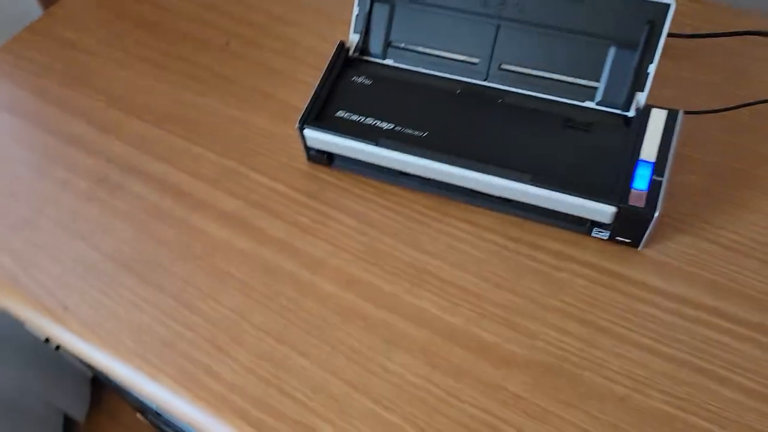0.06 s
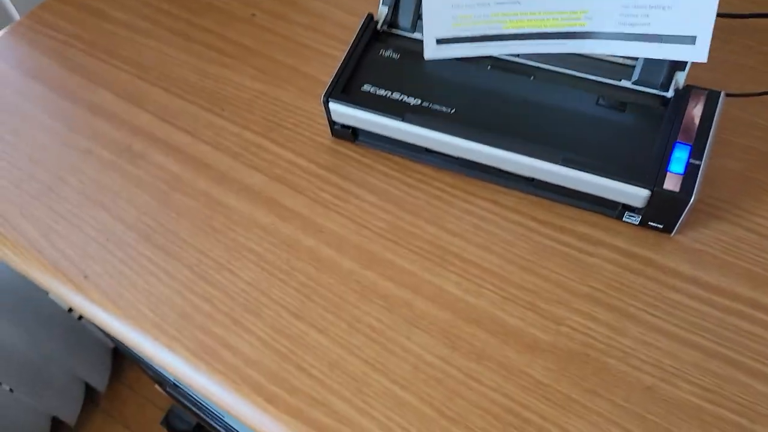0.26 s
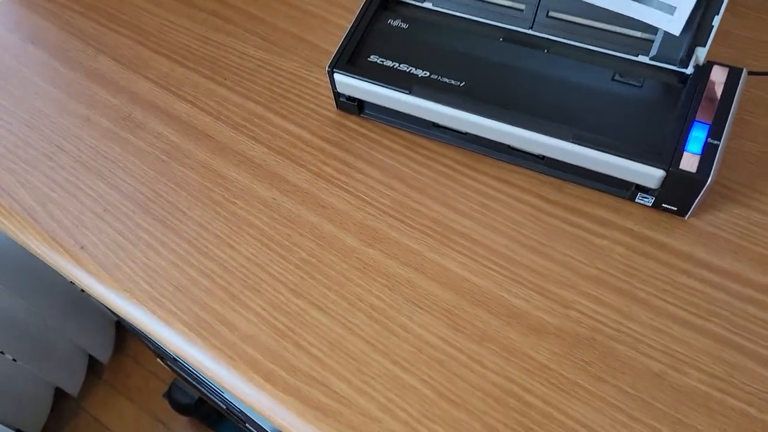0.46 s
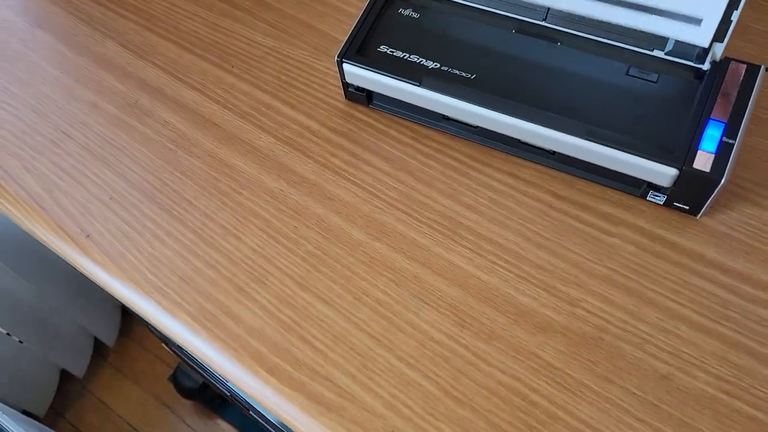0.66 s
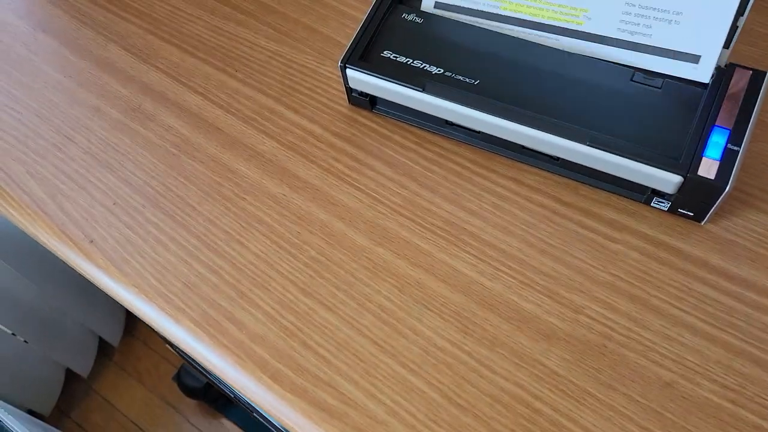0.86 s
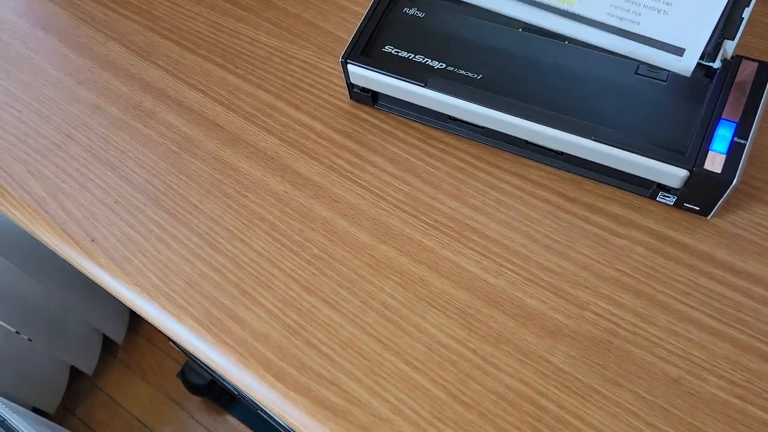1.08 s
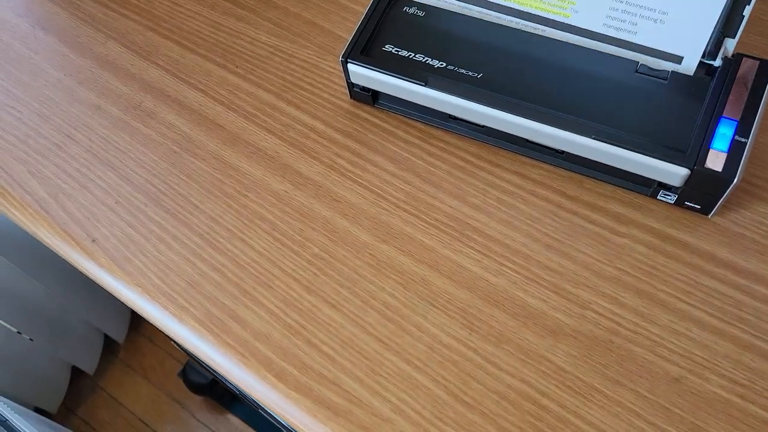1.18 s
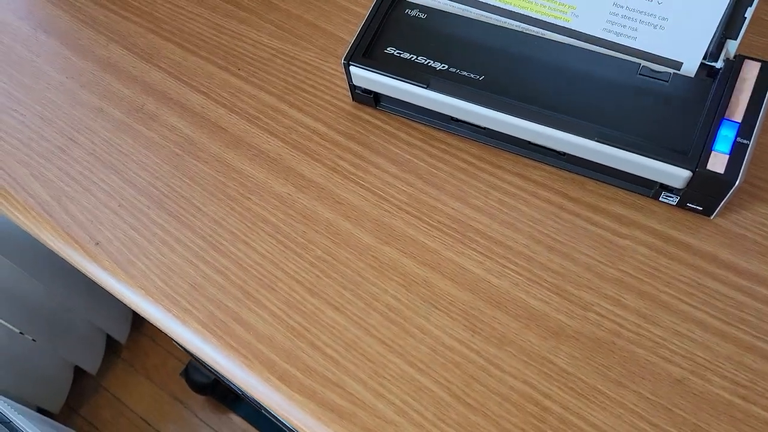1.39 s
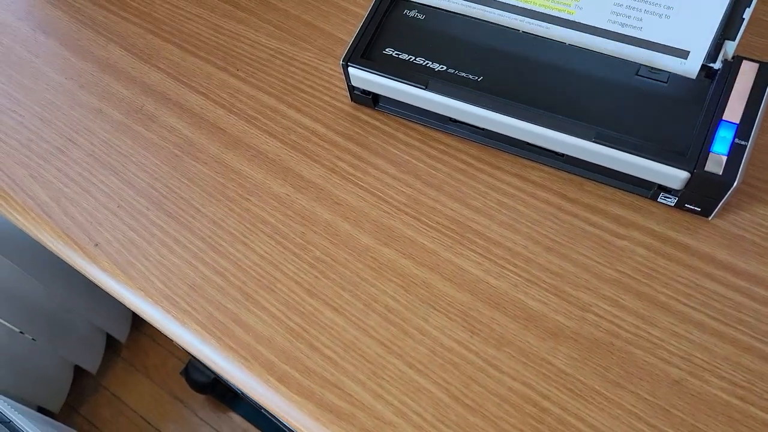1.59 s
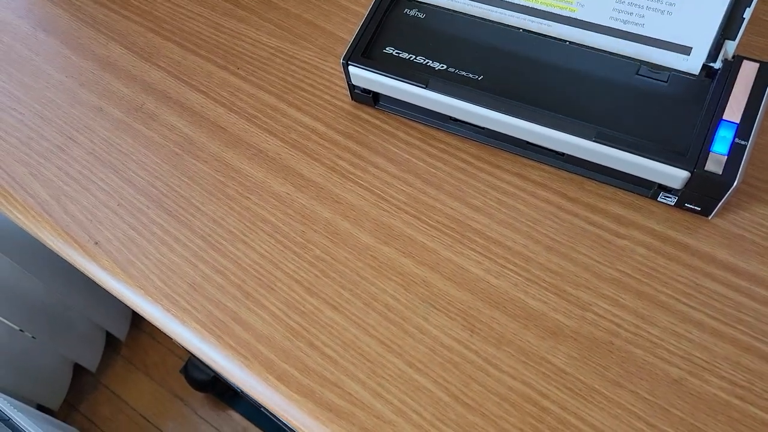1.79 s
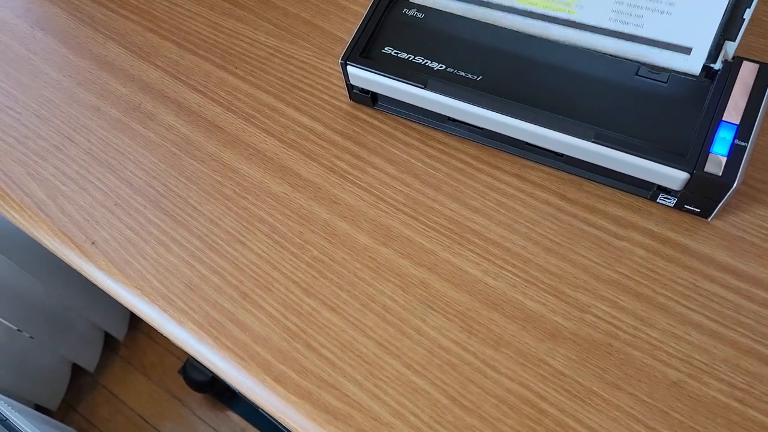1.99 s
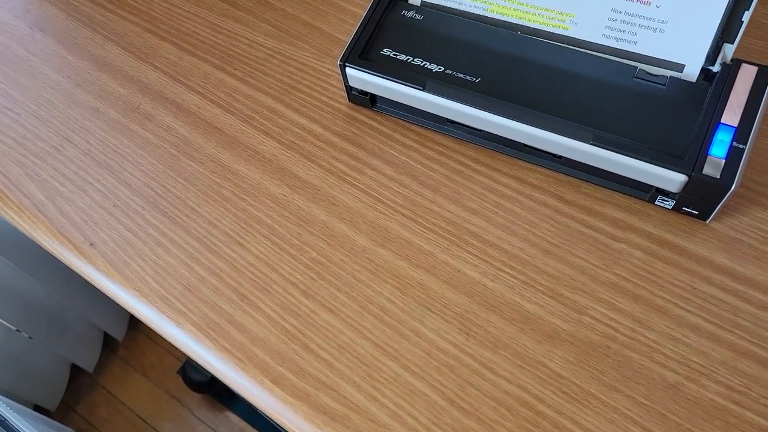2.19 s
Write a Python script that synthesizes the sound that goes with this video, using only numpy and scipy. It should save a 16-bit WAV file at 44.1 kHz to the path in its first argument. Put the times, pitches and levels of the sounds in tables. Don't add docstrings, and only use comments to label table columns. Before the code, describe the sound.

Paper stack scraped and knocked into a small scanner's hollow plastic feed tray, in a quiet room

```python
import sys
import numpy as np
from scipy import signal
from scipy.fft import rfft, irfft, next_fast_len
from scipy.io import wavfile

SR = 44100
rng = np.random.default_rng(int(sys.argv[2]) if len(sys.argv) > 2 else 0)


def store_pcm(level_fs):
    pcm = np.round(np.clip(level_fs, -1, 1) * 32767).astype(np.int16)
    wavfile.write(sys.argv[1], SR, np.atleast_2d(pcm).T)


def linear_from_db(decibels):
    return 10 ** (np.asarray(decibels, float) / 20)


N = 99225


def rms_one(x):
    return x / np.sqrt(np.mean(x ** 2) + 1e-20)


def in_time(rows, outside=None):
    s, db = np.transpose(rows)
    return np.interp(np.arange(N) / SR, s, db, left=outside, right=outside)


def at_hz(points, hz):
    point_hz, value = np.transpose(points)
    return np.interp(np.log(hz), np.log(point_hz), value)


def drift(rate_hz):
    pole = np.exp(-80 * np.pi * rate_hz / SR)
    white = rng.standard_normal(N // 40 + 2002)
    slow = signal.lfilter([1], [1, -2 * pole, pole * pole], white)[2000:]
    return np.interp(np.arange(N) / 40, np.arange(len(slow)), rms_one(slow))


def ring(clicks, hz, t60_s):
    r = linear_from_db(-60 / (max(t60_s, 1e-4) * SR))
    w = 2 * np.pi * hz / SR
    return signal.lfilter([0, np.sin(w)], [1, -2 * r * np.cos(w), r * r], clicks + 1e-18)


def grains(per_s, size, spread_db):
    heights = linear_from_db(spread_db * np.minimum(rng.exponential(1, size), 4))
    signs = rng.choice([-1, 1], size)
    return rms_one(heights * signs * (rng.random(size) < per_s / SR))


# frequency in Hz, level in dB, t60 in seconds.
TRAY_MODES = [(248, -2, 0.044), (337, -1, 0.076), (441, -6, .04), (700, -12, 0.054), (1091, -7, 0.041),
              (1153, -6.5, 0.034), (1334, -6, 0.024), (1514, -2.5, 0.018), (1768, -3.5, 0.015),
              (2057, -5.5, 0.019), (2093, -24, 0.019), (2473, 2.5, 0.0053), (3280, 2.5, 0.0043),
              (4600, -23, 0.041)]
# frequency in Hz, level in dB per Hz.
SNAP_COLOUR = [(59, -38), (100, -16), (736, -11), (2080, -15.5), (2270, 15), (3400, -16), (4770, 0),
               (11200, -30.5), (16000, -46)]


def bodies():
    snaps = []
    for hz in np.geomspace(150, 15500, 24):
        level_db = at_hz(SNAP_COLOUR, hz) + 10 * np.log10(hz / 1500)
        snaps.append((hz, level_db, 5 / hz, 1))
    return [(*mode, 0) for mode in TRAY_MODES] + snaps


# start in seconds, peak in dB, favoured ring in Hz, rattle t60 in seconds, thump in dB.
KNOCKS = [(.320, -2.5, 2080, 0.044, -8), (.442, -22, 700, 0.092, -3), (.612, -45, 3580, 0.037, -10),
          (1.582, -42, 6500, .03, -8), (1.648, -42.5, 6500, .04, -1), (1.664, -42, 6000, .06, -2),
          (2.09, -46, 6760, 0.012, -7), (1.108, -43, 4540, 0.036, 1), (.527, -37, 5700, 0.014, -17),
          (.667, -47, 5900, .04, 0), (.840, -31.5, 790, 0.15, -19), (.846, -27, 2050, 0.14, -1.5),
          (.918, -25.5, 3410, 0.065, -13), (1.065, -27.5, 1790, 0.047, -1.5),
          (1.201, -22, 4190, 0.079, -3.5), (1.2446, -7.5, 1470, 0.027, -6), (1.245, -8, 4600, 0.017, -8),
          (1.574, -44, 3580, 0.045, -10), (1.601, -33.5, 6300, 0.026, 7.5), (2.129, -32, 3240, 0.045, -4)]
# start in seconds, peak in dB, favoured ring in Hz, rattle t60 in seconds, thump in dB.
NUDGES = [(0.037, -34, 1740, 0.13, 7), (0.182, -27, 2240, 0.045, -16), (.213, -32, 1060, 0.028, -28),
          (0.25, -7, 1120, 0.027, -44), (.26, -8.5, 4200, 0.03, -18), (.449, -15, 3400, 0.073, -14),
          (.53, -24.5, 1750, 0.073, -6), (.926, -29.5, 1500, 0.065, -6), (1.123, -37.5, 1690, 0.15, -14),
          (1.265, -39.5, 4020, 0.027, -10), (1.975, -51, 3800, 0.084, -2), (2.061, -53.5, 6560, 0.1, -3),
          (0.312, -14, 1500, 0.011, 6), (0.34, -19, 2020, 0.056, -11), (0.725, -43, 3970, 0.049, -9),
          (0.892, -29, 350, 0.065, 5), (1.226, -11, 1950, 0.066, -9.5), (1.248, -8.5, 700, 0.057, -5),
          (1.164, -36.5, 1580, 0.098, -4), (1.61, -29.5, 1150, 0.048, 3), (1.646, -43, 1100, 0.079, 11),
          (1.668, -40.5, 440, 0.18, 12), (2.136, -31.5, 3120, 0.13, 4), (2.164, -33, 2020, 0.046, 0)]
RATTLE_PER_S, RATTLE_DB, BRUSH_DB = 7100, -21, -20
SWELL_S, CONTACT_S, BOUNCE_S = .0025, .0006, .0008
RING_DB, SNAP_DB, SIDE_LUCK_DB = -14.5, -6.5, 1.2


def contact_force(db, t60_s, hard, span):
    t = np.arange(span) / SR
    hit = linear_from_db(-60 * t / np.clip(t60_s, .004, .2)) * grains(RATTLE_PER_S, (2, span), 3.0)
    if hard:
        hit = linear_from_db(RATTLE_DB) * hit
        bounces = [0, int(BOUNCE_S * SR / 2), int(BOUNCE_S * SR)]
        hit[:, bounces] = [[.3, -.8, .5], [.5, -1, -.2]]
    else:
        hit = linear_from_db(BRUSH_DB) * hit * np.minimum(t / SWELL_S, 1)
    return linear_from_db(db) * hit


def strike_colour(hz, favoured_hz, thump_db):
    colour_db = thump_db
    if hz > 500:
        tilt_db = 3 * np.log2(favoured_hz / 2000)
        colour_db = tilt_db * np.log2(min(hz, 6000) / 1500)
    favour = np.exp(-(np.log2(hz / favoured_hz) / .22) ** 2)
    dull_octaves = max(np.log2(hz / 7000), 0)
    return colour_db + 8 * favour - 6 * dull_octaves


def knocks():
    rows, rings, span = KNOCKS + NUDGES, bodies(), SR // 5
    luck = rng.normal(0, 1, (len(rows), len(rings), 2))
    hits = [contact_force(db, t60_s, k < len(KNOCKS), span) for k, (_, db, _, t60_s, _) in enumerate(rows)]
    out = np.zeros((2, N + span))
    for m, (hz, level_db, t60_s, snap) in enumerate(rings):
        force = np.zeros((2, N + span))
        for (s, _, favoured_hz, _, thump_db), hit, chance in zip(rows, hits, luck):
            colour_db = strike_colour(hz, favoured_hz, thump_db)
            luck_db = SIDE_LUCK_DB * chance[m] + 1.0 * chance[m].sum()
            start = int((s + CONTACT_S) * SR)
            force[:, start:start + span] += linear_from_db(colour_db + luck_db)[:, None] * hit
        kind_db = SNAP_DB if snap else RING_DB
        out += linear_from_db(level_db + kind_db) * ring(force, hz, t60_s) * (-1) ** m
    return out[:, :N]


# time in seconds, level in dB.
DRAGS = [
    [(0.9, -72), (0.95, -66.5), (1.03, -53.5), (1.06, -56), (1.09, -67), (1.14, -59.5), (1.2, -69)],
    [(0.025, -55), (0.045, -65), (0.1, -64), (0.15, -57), (0.17, -84)],
    [(0.17, -56), (0.184, -43), (0.2, -36), (0.226, -25), (0.246, -36.5), (0.262, -19.5), (0.285, -51),
     (0.308, -33.5), (0.315, -35)],
    [(0.325, -17), (0.359, -43.5), (0.373, -33), (0.435, -48), (0.451, -40), (0.64, -73)],
    [(1.25, -53), (1.254, -62), (1.308, -49.5), (1.346, -53.5), (1.5, -84)],
    [(1.57, -73), (1.574, -69), (1.616, -44), (1.626, -65), (1.645, -64), (1.67, -52.5), (1.7, -56.5),
     (1.72, -67), (1.85, -91)],
]
# thin below in Hz, dull above in Hz, paper crackle against tray ring in dB.
PASSES = [(600, 5500, 11), (330, 2600, -17), (753, 2540, -10.5), (350, 3330, 13), (306, 4800, 27.5),
          (860, 1460, -13)]
DRAG_PER_S, DRAG_DB, DRAG_LUMP_DB = 4000, 4, 1.5


def drag():
    force = grains(DRAG_PER_S, (2, N), 3.0) * linear_from_db(DRAG_LUMP_DB * drift(60))
    force[0] = .5 * force[0] + .5 * force[1]
    rings = bodies()
    out = np.zeros((2, N))
    for rows, (thin_hz, dull_hz, crackle_db) in zip(DRAGS, PASSES):
        part = slice(int(rows[0][0] * SR), int((rows[-1][0] + .1) * SR))
        push = (linear_from_db(in_time(rows, outside=-120)) * force)[:, part]
        ringing = sum(linear_from_db(db) * ring(push, hz, t60_s) for hz, db, t60_s, snap in rings if not snap)
        crackle = sum(linear_from_db(db) * ring(push, hz, t60_s) for hz, db, t60_s, snap in rings if snap)
        mix = rms_one(rms_one(ringing) + linear_from_db(crackle_db) * rms_one(crackle))
        band = signal.butter(2, [thin_hz, dull_hz], "band", fs=SR, output="sos")
        mix = rms_one(signal.sosfilt(band, mix))
        out[:, part] += linear_from_db(DRAG_DB) * mix * np.sqrt(np.mean(push ** 2))
    return out


# time in seconds, level in dB.
BOOMS = [
    (0.32, -30.5),
    (0.447, -45),
    (1.245, -40.5),
    (1.603, -47.5),
    (2.136, -44.5),
]
# frequency in Hz, level in dB, t60 in seconds.
DESK_MODES = [(121.4, -5.5, 0.13), (152, -6, 0.099), (207.6, -4, 0.14)]


def desk():
    s, db = np.transpose(BOOMS)
    clicks = np.zeros(N)
    clicks[(s * SR).astype(int)] = linear_from_db(db)
    return sum(linear_from_db(level_db) * ring(clicks, hz, t60_s) for hz, level_db, t60_s in DESK_MODES)


# frequency in Hz, left-right likeness from 0 to 1.
LIKENESS = [(60, 0.94), (150, 0.94), (300, 0.43), (700, 1), (3000, 0.078), (12000, 0.083)]


def banded_noise(spectrum, patchy_db, shared_db):
    out, together = 0, drift(14)
    edges = 22 * 2 ** np.arange(0, 9.9, 1 / 3)
    white = rng.standard_normal((2, 2, N))
    for k, (low, high) in enumerate(zip(edges, edges[1:])):
        if not spectrum[0][0] < low < spectrum[-1][0]:
            continue
        band = signal.butter(2, [low, high], "band", fs=SR, output="sos")
        mid, side = signal.sosfilt(band, white[k % 2])
        hz = np.sqrt(low * high)
        alike = np.clip(at_hz(LIKENESS, hz), -1, 1)
        gain = linear_from_db(at_hz(spectrum, hz) + shared_db * together + patchy_db * drift(28.0))
        out = out + gain * (np.sqrt(1 + alike) * mid + np.sqrt(1 - alike) * side * [[1], [-1]])
    return rms_one(out)


# time in seconds, level in dB.
SLIDES = [
    [(0.0, -74), (0.012, -87), (0.036, -69), (0.062, -72), (0.096, -67.5), (0.176, -69), (0.2, -80.5),
     (0.276, -58), (0.3, -62)],
    [(0.3, -64.5), (0.322, -42), (0.332, -51), (0.396, -67), (0.456, -57), (0.5, -72)],
    [(0.5, -66.5), (0.546, -60), (0.58, -72), (0.614, -68), (0.64, -82), (0.66, -80), (0.668, -81),
     (0.7, -75)],
    [(0.7, -86), (0.722, -67), (0.74, -62), (0.808, -66.5), (0.85, -57.5), (0.912, -68), (0.92, -53),
     (0.93, -68.5), (0.96, -69.5)],
    [(0.96, -82.5), (0.974, -76.5), (1.07, -70.5), (1.08, -79), (1.09, -79), (1.14, -63.5), (1.154, -71),
     (1.17, -72.5), (1.19, -62.5)],
    [(1.19, -71), (1.204, -51.5), (1.216, -53.5), (1.248, -61.5), (1.256, -82), (1.286, -74), (1.362, -74),
     (1.45, -102)],
    [(1.565, -104), (1.575, -85.5), (1.593, -73), (1.603, -57.5), (1.613, -71), (1.637, -70.5),
     (1.667, -74), (1.715, -83), (1.8, -84.5)],
    [(1.9, -104), (1.994, -79.5), (2.036, -91.5), (2.072, -71), (2.122, -70), (2.128, -59.5),
     (2.184, -72.5), (2.24, -72.5), (2.25, -67)],
]
# frequency in Hz, level in dB.
HISS = [(350, -51), (600, -5.5), (900, -9), (1700, -8), (3680, -5.5), (7000, -8.5), (8400, -19),
        (16500, -21)]


def slide():
    moves = sum(linear_from_db(in_time(rows, outside=-120)) for rows in SLIDES)
    return linear_from_db(14) * moves * banded_noise(HISS, patchy_db=1.0, shared_db=1.0)


# frequency in Hz, level in dB.
ROOM_HUM = [(13, -44), (22, -17), (60, 1), (86, -18.5), (121, -14), (144, -42), (185, -17), (365, -12.5),
            (700, -36), (910, -74), (1540, -120)]


def hum():
    return linear_from_db(-52.5) * banded_noise(ROOM_HUM, patchy_db=.8, shared_db=.3)


# frequency in Hz, level in dB.
AIR = [(350, -62.5), (600, -31), (801, -9), (1290, -15.5), (4000, -19.5), (7000, -27), (8600, -46),
       (16500, -42)]


def air():
    return linear_from_db(-69) * banded_noise(AIR, patchy_db=.8, shared_db=.5)


ROOM_DB, ROOM_T60_S, WALL_CUT_HZ = -14, 0.3, 5630


def room(x):
    size = next_fast_len(N + SR)
    hz = np.arange(size // 2 + 1) * SR / size
    spectrum, out = rfft(x.mean(axis=0), size), []
    for lags_s in rng.uniform(.006, .03, (2, 8)):
        echoes = 0
        for k, lag_s in enumerate(lags_s):
            wall = linear_from_db(-60 * lag_s / ROOM_T60_S) / (1 + 1j * hz / WALL_CUT_HZ)
            loop = wall * np.exp(-2j * np.pi * hz * lag_s)
            echoes = echoes + loop / (1 - loop) * (-1) ** k
        out.append(irfft(spectrum * echoes, size)[:N])
    return np.array(out)


def ports(x):
    high = signal.butter(2, 260, "high", fs=SR, output="sos")
    side = signal.sosfilt(high, x[0] - x[1])
    return x.mean(axis=0) + .5 * side * [[1], [-1]]


def scene():
    near = knocks() + drag() + desk()
    return ports(near + linear_from_db(ROOM_DB) * room(near)) + slide() + hum() + air()


def band_limit(x):
    return signal.sosfilt(signal.butter(12, 16830, fs=SR, output="sos"), x)


LEFT_DB, RIGHT_DB, LEFT_LAG = -1.2, 1.2, 7
TOP, CUTOFF_HZ = .95, 16350


def record(dry):
    left = np.concatenate([np.zeros(LEFT_LAG), dry[0, :-LEFT_LAG]])
    both = np.array([linear_from_db(LEFT_DB) * left, linear_from_db(RIGHT_DB) * dry[1]])
    both = TOP * np.tanh(both / TOP)
    both = signal.sosfilt(signal.cheby2(14, 45, CUTOFF_HZ, fs=SR, output="sos"), both)
    return band_limit(both)


dry = scene()
out = record(dry)
store_pcm(out)
```